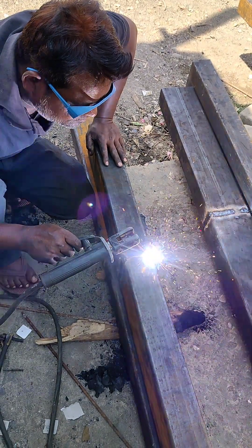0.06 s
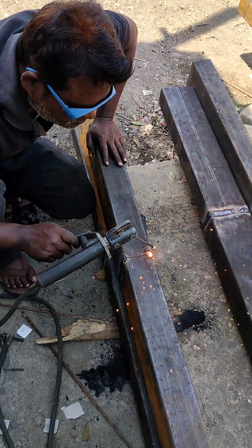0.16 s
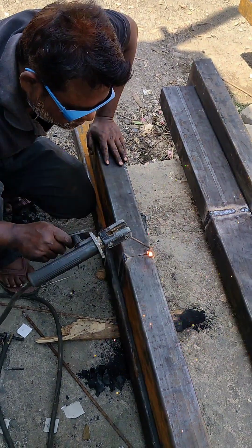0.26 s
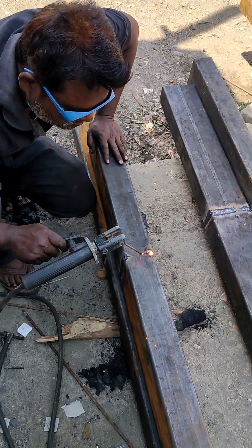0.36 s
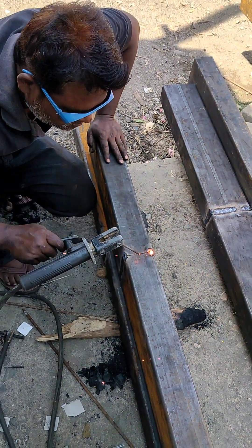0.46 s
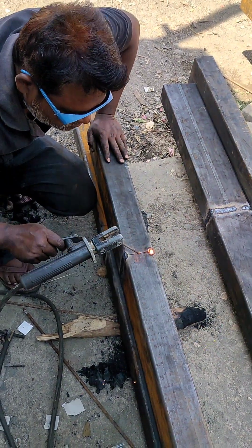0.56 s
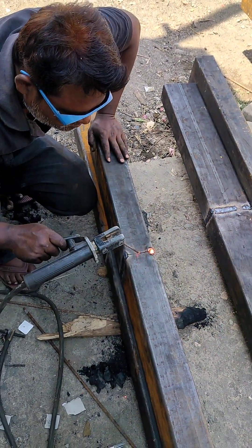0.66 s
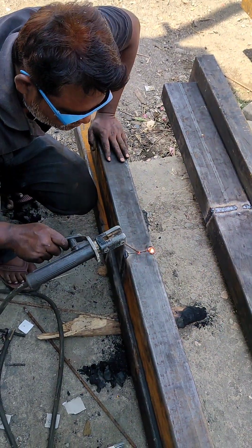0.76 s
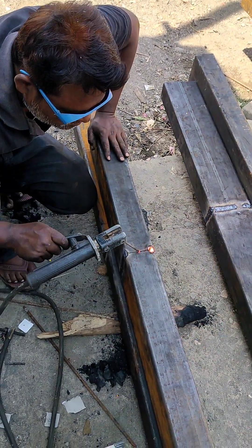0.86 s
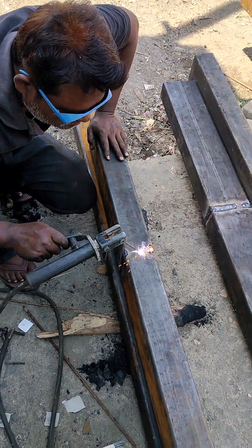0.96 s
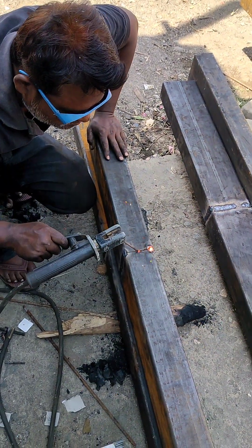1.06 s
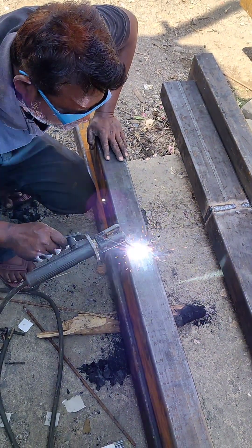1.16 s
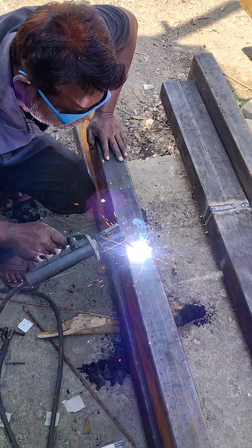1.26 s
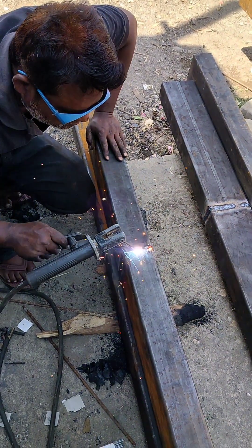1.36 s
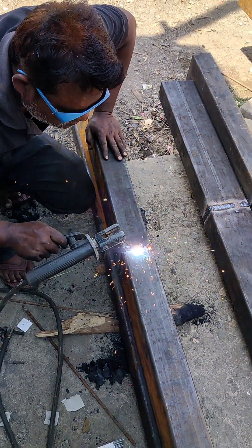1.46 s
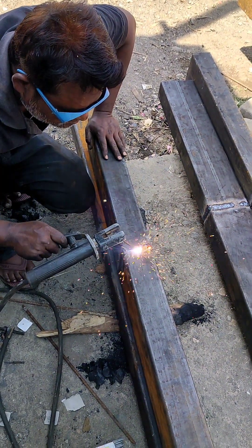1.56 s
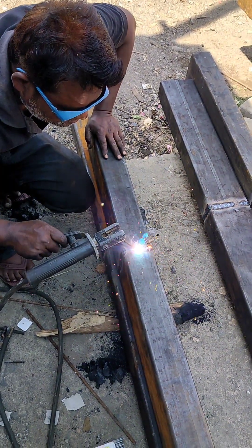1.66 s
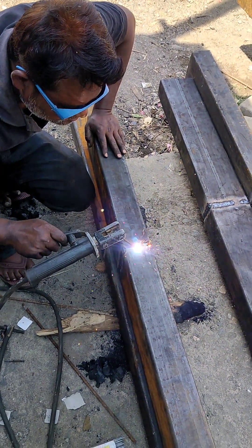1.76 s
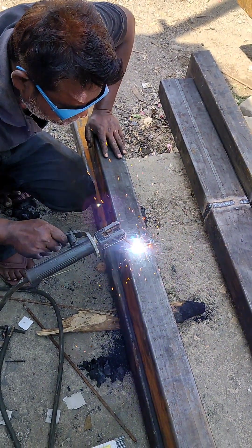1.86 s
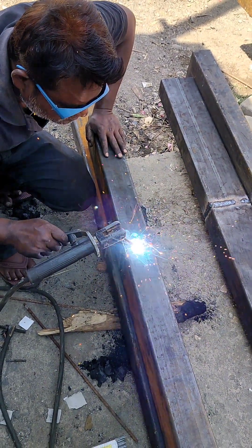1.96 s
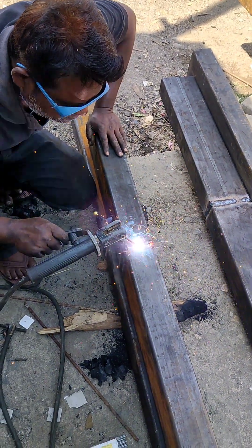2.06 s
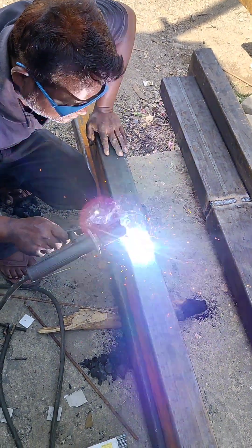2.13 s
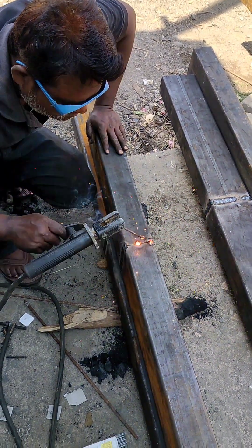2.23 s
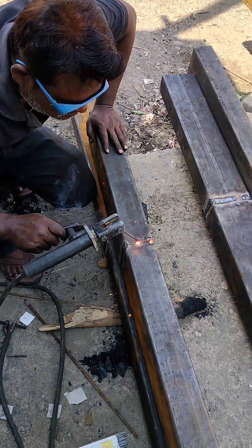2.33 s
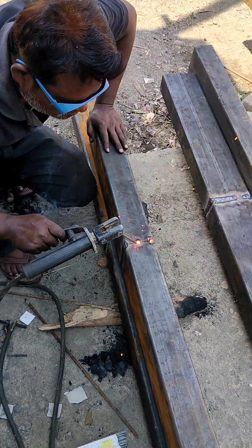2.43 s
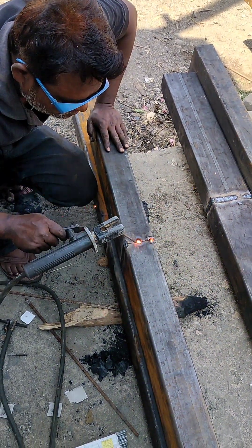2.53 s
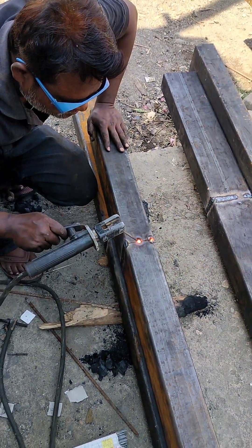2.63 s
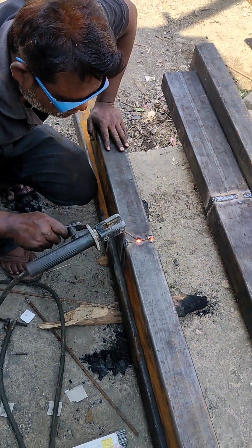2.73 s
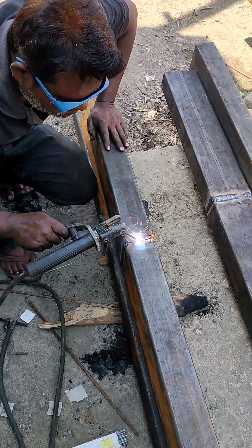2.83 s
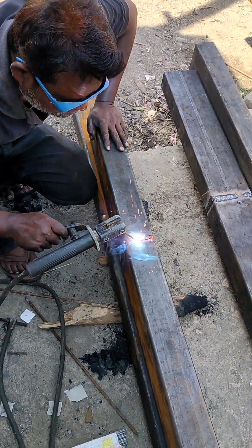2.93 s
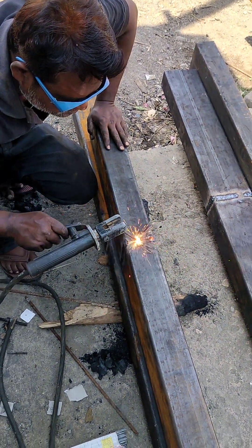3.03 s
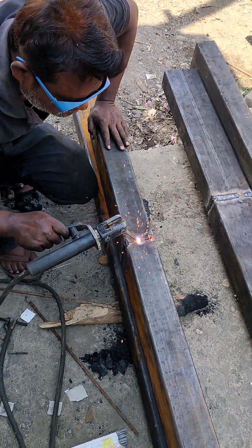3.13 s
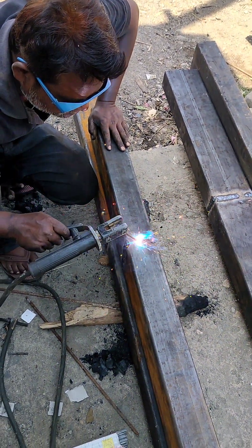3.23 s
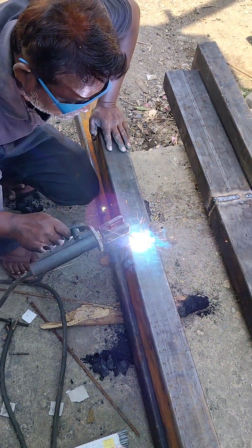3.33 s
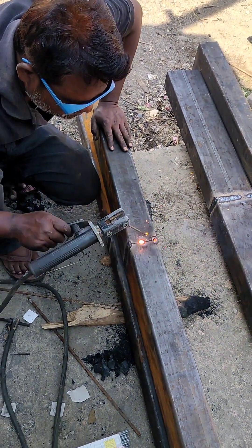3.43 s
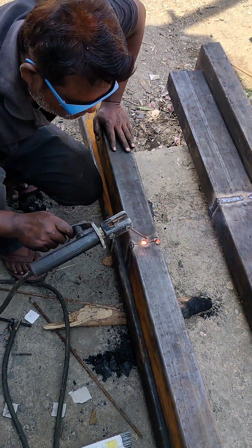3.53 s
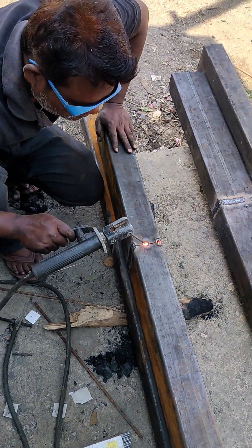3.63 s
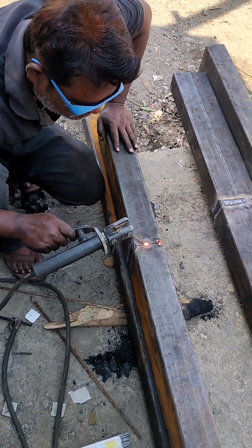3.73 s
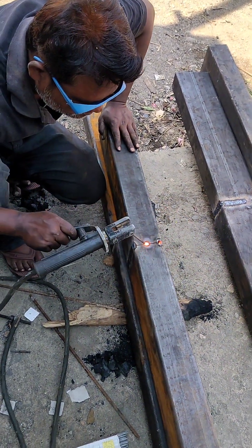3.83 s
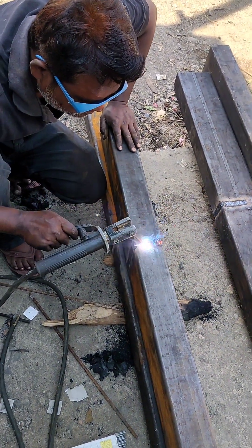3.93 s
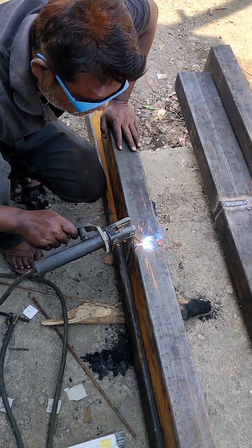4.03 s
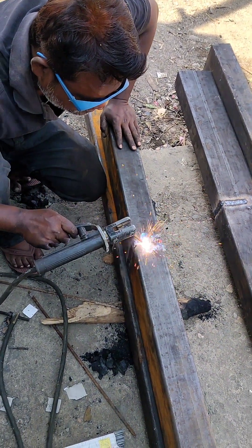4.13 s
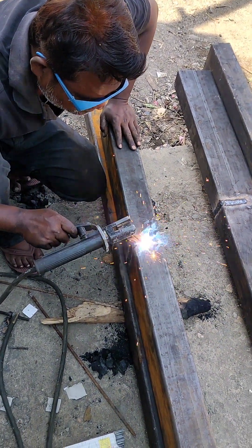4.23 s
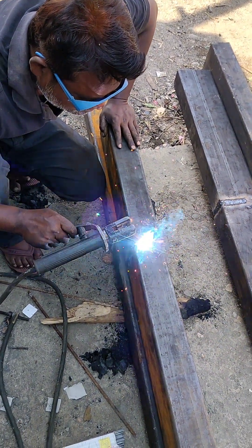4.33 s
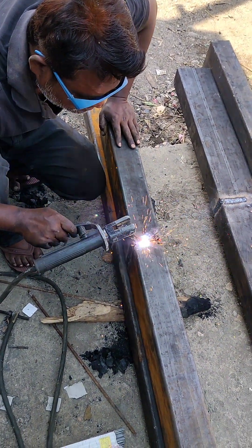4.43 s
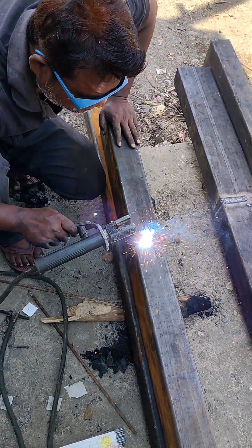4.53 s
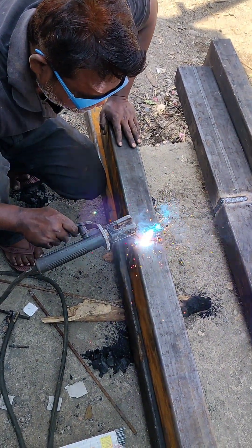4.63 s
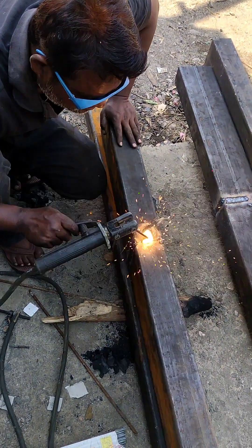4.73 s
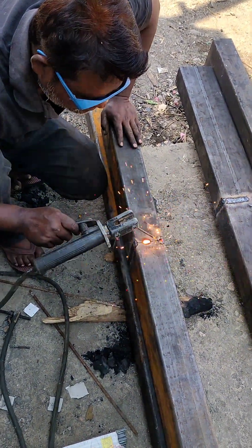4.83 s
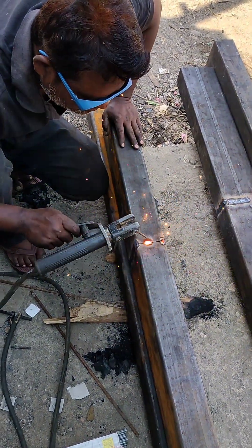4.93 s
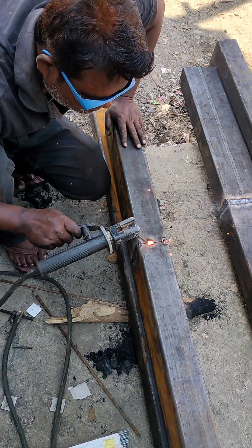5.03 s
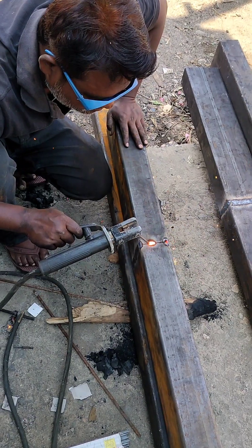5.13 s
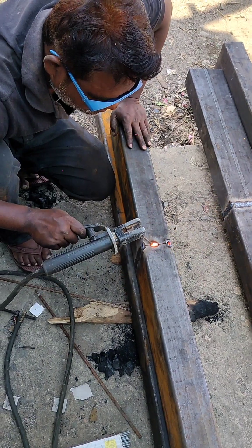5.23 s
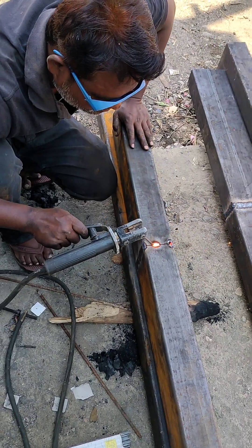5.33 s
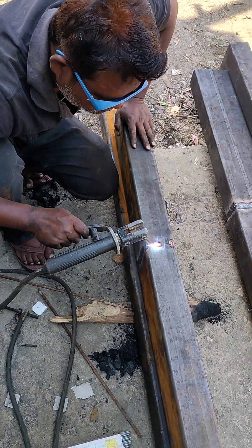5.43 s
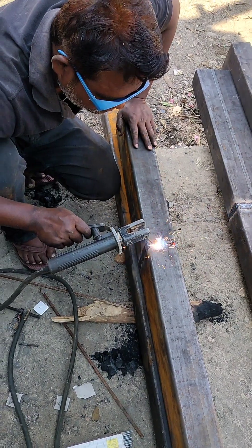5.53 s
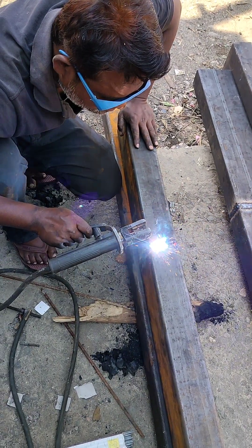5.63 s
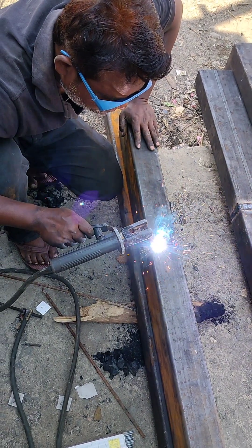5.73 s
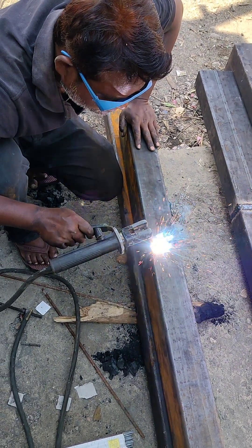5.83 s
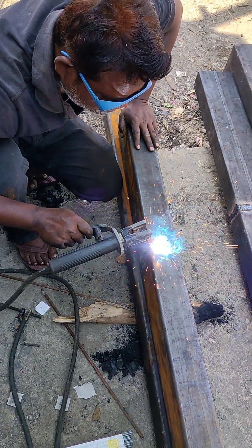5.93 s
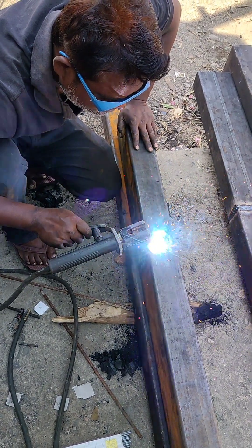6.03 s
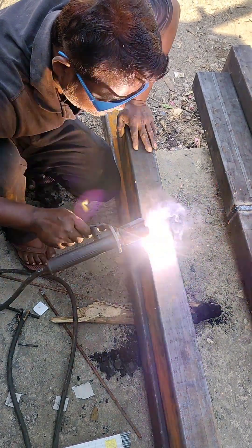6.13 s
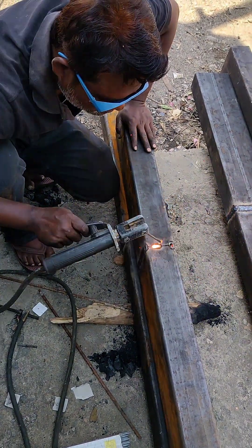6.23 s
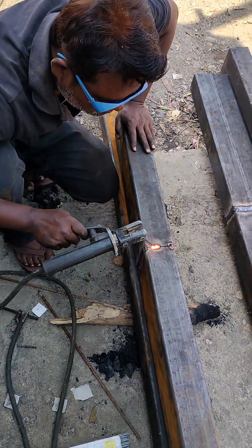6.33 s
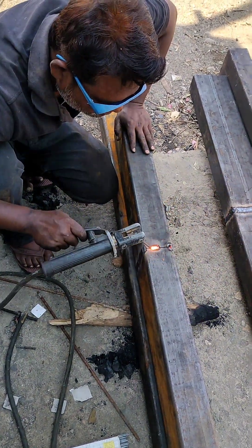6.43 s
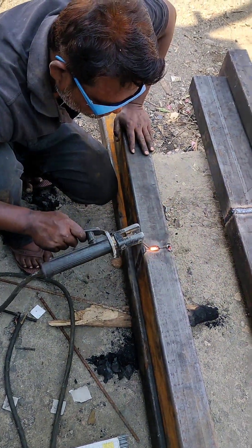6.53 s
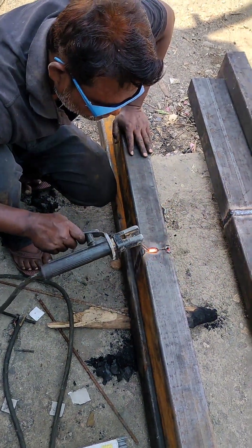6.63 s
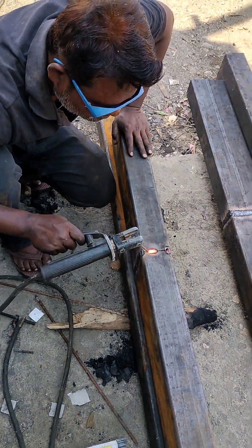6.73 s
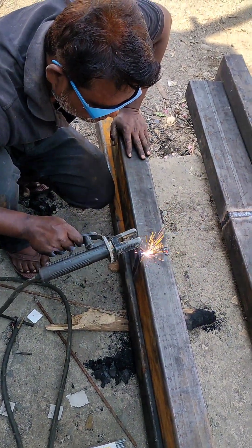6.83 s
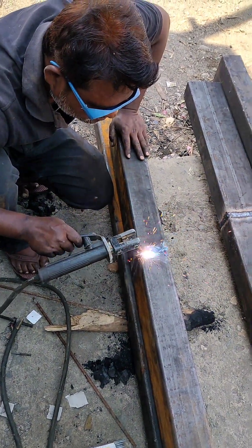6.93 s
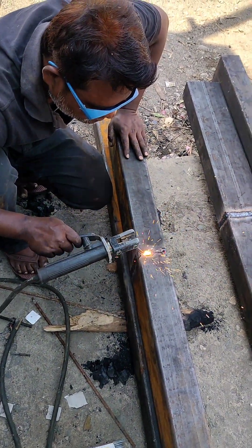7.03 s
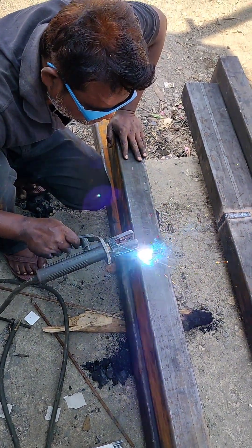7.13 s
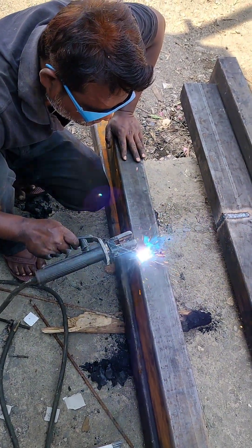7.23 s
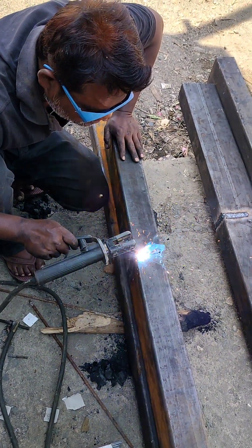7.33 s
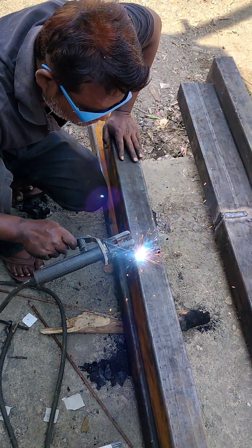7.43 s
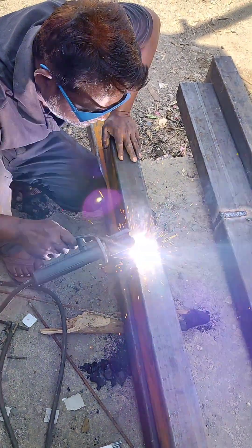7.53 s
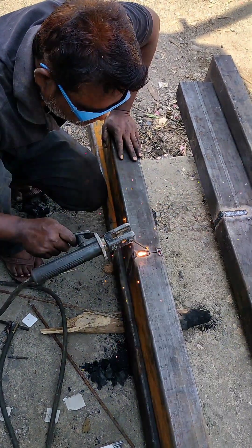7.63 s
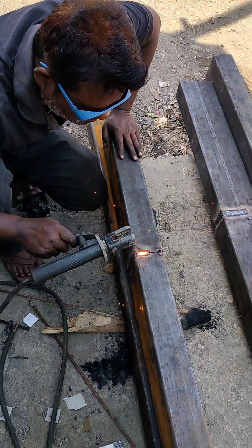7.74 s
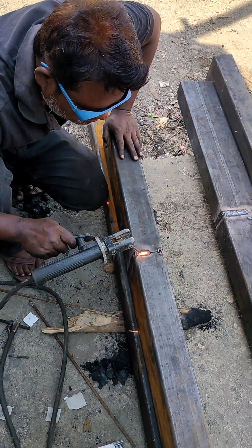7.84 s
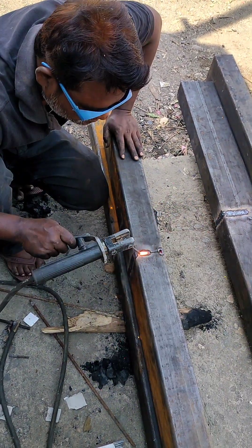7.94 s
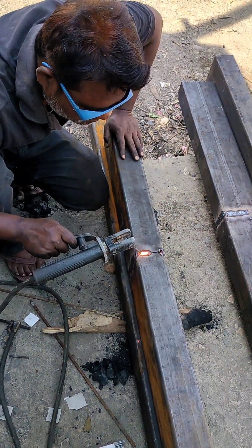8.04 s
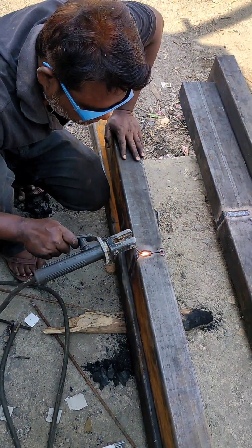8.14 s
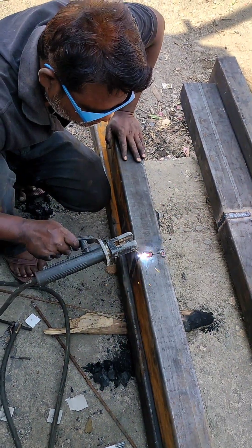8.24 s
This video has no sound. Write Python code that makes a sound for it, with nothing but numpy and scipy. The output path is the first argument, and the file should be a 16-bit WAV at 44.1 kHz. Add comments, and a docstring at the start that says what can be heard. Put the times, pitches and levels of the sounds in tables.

```python
"""A scrap of welding sizzle, then a slow engine chugging further off and a light breeze on the microphone.
The arc, close below on a steel tube, comes in short runs: fluttering noise for sizzle and gas, kicks for sparks.
Bursting drops bang and shove the two microphone ports, which answer with a low thump.
The engine is a repeating pattern of ringing blows over a roar; the air and breeze are shaped noise.
Now and then something clinks in the distance: short rings of narrow noise."""
import sys
import numpy as np
from scipy import signal
from scipy.fft import rfft, irfft, next_fast_len
from scipy.io import wavfile
from scipy.ndimage import uniform_filter1d, map_coordinates

SR = 44100
rng = np.random.default_rng(int(sys.argv[2]) if len(sys.argv) > 2 else 0)


def persist_wave(psi):
    """Save psi, clipped to +-1, as 16-bit WAV."""
    counts = np.round(np.clip(psi, -1, 1) * 32767).astype(np.int16)
    wavfile.write(sys.argv[1], SR, np.atleast_2d(counts).T)


N = 364707
T = np.arange(N) / SR  # s

# Levels and pushes in the tables and settings are relative: the functions trim them further.
# Runs of the arc: strike t/s, break t/s, steady sizzle level/dB,
# gas rush level/dB as the electrode pulls away, length of that pull t/s
BURNS = [(0, 0.039, -33.5, -48, .05), (0.919, 0.946, -31.5, -62, .03), (1.096, 2.092, -34.5, -39, 0.042),
         (2.746, 3.31, -36, -35, 0.014), (3.887, 4.694, -34, -37, 0.073), (5.376, 6.069, -36, -39.5, 0.44),
         (6.711, 7.518, -37, -30.5, 0.033), (8.191, 8.265, -42, -50, 0.044)]
# Bursting drops: t/s, signed push on left port, on right port [linear], crack level/dB, bang level/dB
POPS = [(1.213, -0.24, -0.44, -9.5, -19), (1.3006, -.1, 0.35, -41, -33), (1.4003, -0.31, 0.081, -14, -24.5),
        (1.4658, -0.33, -.05, -14, -32), (1.5204, -0.54, -0.044, -19, -34), (1.524, 0.37, 0.44, -27, -20),
        (1.6156, -0.54, -.02, -15.5, -20.5), (1.6858, -0.49, -0.26, -16.5, -20),
        (1.7348, -0.54, -0.01, -14, -20), (2.7871, -0.27, -0.11, -12, -33), (2.929, -0.43, -0.22, -13, -22),
        (3.0324, -0.18, -0.045, -13.5, -35), (3.0643, -0.15, -0.033, -15.5, -34),
        (3.98, -0.48, -0.16, -19.5, -25), (4.067, -0.63, 0, -16, -24), (4.1353, 0.51, 0.038, -23.5, -38),
        (4.1514, -0.26, 0.011, -17, -28), (4.2062, 0.55, 0.26, -28, -17.5), (4.4597, -.12, -0.2, -29, -35),
        (4.4732, -0.09, 0.45, -24, -26), (4.4921, 0.49, 0.011, -30, -11.5), (4.5754, -.16, 0.33, -16, -21),
        (5.4512, -0.29, -.05, -25, -29), (5.5394, -0.47, 0.012, -17.5, -29), (5.598, 0.51, 0.092, -18, -32),
        (5.8471, -0.56, -0.024, -20.5, -23), (5.8526, 0.35, .3, -18, -31),
        (5.8716, -0.16, 0.27, -23.5, -14), (5.8829, -0.53, -0.38, -34, -25.5),
        (5.9044, 0.013, 0.52, -27, -19.5), (5.918, 0, -0.36, -20, -32), (6.887, -0.53, -.16, -15.5, -22),
        (6.9344, 0.79, 0.27, -25.5, -15), (6.9556, 0.5, -0.051, -26, -10.5),
        (6.9864, -0.24, -0.035, -21.5, -17.5), (7.034, 0.029, 0.39, -24, -19.5),
        (7.0894, -0.12, -0.047, -13.5, -20), (7.1525, 0.49, 0.21, -34, -14.5),
        (7.1745, -0.57, -0.23, -23, -39), (7.1788, 0.26, .38, -35, -16.5), (7.25, 0.049, -0.31, -18.5, -12),
        (7.3857, 0.52, 0.31, -24.5, -18), (8.2229, 0.49, -0.036, -21.5, -14)]
# The loudest sparks: t/s, level/dB
SNAPS = [(1.099, -23.5), (1.13, -19.5), (1.2766, -15), (1.3488, -20), (1.368, -20), (1.395, -15),
         (1.4541, -16.5), (1.48, -16.5), (1.5133, -16), (1.6012, -24.5), (1.7528, -18.5), (1.768, -16),
         (1.906, -16), (2.0159, -16), (2.066, -24), (2.7683, -17.5), (2.8101, -18.5), (2.9167, -14),
         (2.962, -21), (2.9952, -16.5), (3.0477, -13.5), (3.0868, -19), (3.1627, -15.5), (3.1825, -16.5),
         (3.196, -20), (3.285, -19), (3.969, -16.5), (4.0505, -21), (4.102, -18.5), (4.2236, -15),
         (4.3141, -22), (4.4318, -16.5), (4.482, -17), (4.5254, -20.5), (4.637, -20), (5.4353, -24),
         (5.4403, -17), (5.6227, -20.5), (5.731, -19.5), (5.771, -15.5), (5.8258, -16), (5.973, -17.5),
         (6.0043, -17), (6.0175, -21.5), (6.832, -21.5), (6.8552, -16), (6.9304, -16), (7.1031, -18),
         (7.217, -20), (7.3604, -17), (7.3806, -18.5), (7.4287, -19), (7.4766, -14.5), (7.4796, -21)]
# Distant clinks: t/s, level/dB, f/Hz
CLINKS = [(2.544, -36, 1700), (6.539, -40, 1760), (6.585, -35, 1815), (7.694, -35, 1800)]
# Blows in one engine cycle: share of the cycle [0 to 1], thud level/dB, casing ring level/dB
STROKES = [(.036, -3, -7), (.165, -11, -5), (.297, -1, -20), (.36, -12, -5), (.461, -5, -18),
           (.599, -5, -20), (.616, 0, -20), (.733, -2, -14), (.818, -19, 0)]
# Background beyond the arc: t/s, engine level/dB, yard air level/dB
BACKGROUND = [(0.0, -39.5, -48), (1.04, -36.5, -46), (1.47, -41.5, -48), (2.62, -36.5, -45),
              (5.48, -37.5, -46), (5.78, -39, -44), (8.27, -37, -44)]
# Gusts on the ports: t/s, level/dB
GUSTS = [(.66, -36.5), (.89, -29.5), (1.4, -36.5), (3.1, -42), (3.7, -38), (3.9, -30.5), (4.73, -31.5),
         (4.88, -39.5), (5.42, -31.5), (5.8, -34), (6.6, -48), (8, -43)]

# Resonances of the engine's exhaust, its casing, and the welded tube: f/Hz, width f/Hz, level/dB
EXHAUST = [(167.1, 39.4, -1.5), (234.3, 65, 1), (305.5, 66, -3.5), (358.5, 32.6, -6.5)]
CASING = [(695.5, 23, 12), (920, 70, -8.5), (583, 36, -6)]
TUBE = [(2440, 49, 0), (2570, 50, -15), (4690, 52.6, -3.5), (4990, 41, -4), (5590, 50, 3.5),
        (5800, 34, -25), (6970, 64, -13.5), (11400, 86, -14)]

# Spectrum shapes of sparks, arc sizzle, arc gas and drop bangs: f/Hz, level/dB (per Hz)
SPARK = [(30, -29), (250, -1.5), (900, -20.5), (1700, -9), (2600, -4.5), (4500, -8), (7000, -5), (8100, 4),
         (8700, 2), (9800, 4), (12200, 6), (13800, 0.5), (15800, -5.5)]
SIZZLE = [(200, -5), (1500, -46), (2600, -14), (4000, -8.5), (5300, -5), (7200, -3.5), (8100, 8), (8700, 1),
          (9800, 5.5), (12000, 6), (13800, 1.5), (15800, 2.5)]
GAS = [(300, -32.5), (1000, -0.5), (1600, -4), (2000, 3), (2500, 2.5), (3500, 1), (5000, -11), (9000, -9.5)]
BANG = [(150, -15), (600, 12), (1200, 12), (2300, 9.5), (3500, -2.5), (5000, -36.5), (9000, -5)]
# Spectrum shapes of engine roar, yard air and breeze on the ports: f/Hz, level/dB (per Hz)
ROAR = [(30, -36.5), (100, -4), (140, -9), (190, -1), (300, 0), (380, -1), (440, -33.5), (700, -22),
        (1500, -53)]
AIR = [(240, -30.5), (400, 1.5), (562, -2), (697, 0.5), (742, -10), (979, -2.5), (1160, -12), (1650, -7.5),
       (2320, -12), (3310, -17.5), (3530, -23.5), (5520, -31.5), (10700, -36.5), (16000, -60)]
BUFFET = [(10, -32.5), (30, 1), (55, 9.5), (100, 4), (200, -8), (500, -52)]

# Right port over left port for the close arc: f/Hz, level/dB
RIGHT_PORT = [(300, 12), (1500, -6.5), (2600, 4), (3800, -4), (6500, -4), (8000, 2.5), (12500, 7),
              (15500, -1.5)]
# Right port behind left port for the close arc: f/Hz, phase/rad
RIGHT_LAG = [(1000, 0.12), (4300, 0.18), (5500, 2.4), (6500, 5.16), (8300, 4.8), (10500, 6.9), (13000, 7.2),
             (15500, 6.9)]
# Time for the yard's answer to fall 60 dB: f/Hz, t/s
WALLS = [(200, 0.097), (2500, 0.073), (12000, 0.043)]

ARC_FADE_T60 = .1  # s to fall 60 dB after a break
STRIKE_DB = -31.5  # the crack of the electrode touching down
BUILD_DB, BUILD_S = 6, .12  # a fresh arc starts this much weaker and builds up
CALM_GAS_DB = -49  # gas rush of an undisturbed arc
FLARE_RISE_S, FLARE_FALL_S = 0.011, 0.023  # the arc flares around every snap and pop
FLARE_SIZZLE_DB, FLARE_GAS_DB = -26.5, -24  # the flare, relative to its snap or pop
SPRAY_DB, SPRAY_SCATTER_DB, SPRAY_S = -6.5, 2, .022  # lesser sparks: level under the snap, scatter, delay
NEAR_DB, NEAR_S = -14.5, .006  # close echoes taken together; the latest possible one
CYCLES_PER_S, SPEED_DRIFT = 9.9, .02  # mean engine speed; share by which it wanders
GUST_RISE_S, GUST_FALL_S, LULL_DB = 0.071, 0.1, -49.5  # swell and fade of a gust; breeze between gusts
CLINK_WIDTH_HZ, CLINK_T60 = 220, .11  # breadth of the ring; s to fall 60 dB
TOP_HZ = 15950  # upper band limit


def amp(db):
    """Decibels to gain."""
    return 10 ** (np.asarray(db) / 20)


def unit(x):
    """Scaled to rms 1."""
    return x / np.sqrt(np.mean(x ** 2) + 1e-20)


def along(points, hz):
    """(f/Hz, value) points read on a log frequency axis."""
    f, values = np.transpose(points)
    return np.interp(np.log(hz + 1), np.log(f), values)


def curves(rows):
    """One value per sample for each column after the time."""
    s, *columns = np.transpose(rows)
    return [np.interp(T, s, column) for column in columns]


def wobble(rate):
    """A smooth random curve, rate knots a second."""
    knots = rng.standard_normal(int(N * rate / SR) + 4)
    return map_coordinates(knots, [T * rate])


def filtered(x, response):
    """x times a complex response of frequency."""
    size = next_fast_len(N + SR // 2)
    hz = np.fft.rfftfreq(size, 1 / SR)
    return irfft(rfft(x, size) * response(hz), size)[..., :N]


def coloured(x, spectrum):
    """x through a causal, minimum-phase filter of unit energy with this spectrum."""
    size = 4096
    gains = amp(along(spectrum, np.fft.rfftfreq(size, 1 / SR)))
    cepstrum = irfft(np.log(gains))
    # folding the cepstrum forward puts the filter's energy at its start
    cepstrum[1:size // 2] *= 2
    cepstrum[size // 2 + 1:] = 0
    kernel = irfft(np.exp(rfft(cepstrum)))
    return signal.oaconvolve(x, kernel[None] / np.linalg.norm(kernel), axes=1)[:, :N]


def resonate(x, modes):
    """x through parallel resonances of alternating sign."""
    def response(f):
        total = 0
        for k, (centre, width, db) in enumerate(modes):
            damping = 1j * f * width
            total = total + (-1) ** k * amp(db) * damping / (centre * centre - f * f + damping)
        return total

    return filtered(x, response)


def pair(shape, side_db):
    """Left and right white noise, partly alike: a shared middle and an opposed side."""
    mid, side = rng.standard_normal((2, *shape))
    return unit(np.array([mid + amp(side_db) * side, mid - amp(side_db) * side]))


def rush(spectrum, side_db):
    """Coloured stereo noise of rms 1."""
    return unit(filtered(pair((N,), side_db), lambda hz: amp(along(spectrum, hz))))


def patchy(x, depth_db):
    """x with its colour shifting at random from moment to moment, at rms 1."""
    z = signal.stft(x, nperseg=1024)[2]
    field = rng.standard_normal(z.shape[1:])
    for axis in (0, 1):
        field = uniform_filter1d(field, size=4, axis=axis)
    shifted = signal.istft(z * amp(depth_db * unit(field)), nperseg=1024)[1]
    return unit(shifted[:, :N])


def place(times, shapes):
    """Stereo shapes (2, events, samples) laid down at their times."""
    starts = np.round(np.abs(times) * SR).astype(int)
    index = starts[:, None] + np.arange(shapes.shape[-1])
    return np.array([np.bincount(index.ravel(), s.ravel(), N)[:N] for s in shapes])


def swells(times, db, rise_s, fall_s):
    """A level that swells and fades around each event; overlapping swells add in power."""
    t = np.arange(-(SR // 2), SR // 2) / SR
    shape = np.exp(-(t / np.where(t < 0, rise_s, fall_s)) ** 2)
    power = np.bincount(np.round(np.abs(times) * SR).astype(int), amp(db) ** 2, N)[:N]
    return np.sqrt(np.abs(signal.oaconvolve(power, shape, "same")))


def cracks(times, db, life, side_db, spectrum):
    """Each spark is a dying rattle of random-sign kicks, life in s; db is its energy spread over 1 ms."""
    t = np.arange(SR // 300) / SR
    lives = life * np.exp(0.25 * rng.standard_normal((len(times), 1)))
    envelope = np.exp(-(t / lives) ** 4) + .2 * np.exp(-t / .002)
    bursts = np.sign(pair((len(times), len(t)), side_db)) * envelope
    mean_energy = np.sum(bursts ** 2, axis=2).mean(axis=0)
    bursts /= np.sqrt(mean_energy / (SR / 1000))[:, None]
    return coloured(place(times, bursts * amp(db)[..., None]), spectrum)


def swarm(level, spectrum, count, spread_db, life, side_db):
    """Sparks at random moments, many small and a few large, following a level curve."""
    times = rng.uniform(0, T[-1], size=count)
    size_db = np.minimum(spread_db * rng.exponential(size=count), 13)
    db = 20 * np.log10(level[(times * SR).astype(int)] + 1e-9) + size_db
    return cracks(times, db, life, side_db, spectrum)


def burning(fade_t60):
    """1 while the arc burns: it strikes at once and dies away exponentially after the break."""
    runs = [(T >= on) * amp(-60 * np.maximum(T - off, 0) / fade_t60) for on, off, *_ in BURNS]
    return np.max(runs, axis=0)


def arc_levels():
    """Sizzle and gas in dB: the arc builds up, flares at snaps and pops, and rushes as it is pulled away."""
    strike_s, break_s, steady_db, parting_db, pull_s = np.transpose(BURNS)
    snap_s, snap_db = np.transpose(SNAPS)
    pop_s, _, _, crack_db, bang_db = np.transpose(POPS)
    run = np.searchsorted(strike_s[1:], T)
    steady = amp(steady_db[run] - BUILD_DB * np.exp(-(T - strike_s[run]) / BUILD_S))
    flare_s = np.r_[snap_s, pop_s]
    flare_db = np.r_[snap_db, np.maximum(crack_db, bang_db)]
    flare = swells(flare_s, flare_db, FLARE_RISE_S, FLARE_FALL_S)
    before_break = np.minimum(T - break_s[run], 0)
    parting = amp(parting_db[run]) * np.exp(-(before_break / pull_s[run]) ** 2)
    sizzle = steady ** 2 + (amp(FLARE_SIZZLE_DB) * flare) ** 2
    gas = amp(CALM_GAS_DB) ** 2 + (amp(FLARE_GAS_DB) * flare) ** 2 + parting ** 2
    return 10 * np.log10(sizzle), 10 * np.log10(gas)


def loud_sparks():
    """Single snaps, the cracks of bursting drops, and the electrode touching down at all but the first run."""
    snap_s, snap_db = np.transpose(SNAPS)
    pop_s, _, _, pop_db, _ = np.transpose(POPS)
    spark_s, spark_db = np.r_[snap_s, pop_s], np.r_[snap_db, pop_db]
    loud = cracks(spark_s, spark_db, life=0.00091, side_db=-15.5, spectrum=SPARK)
    strike_s = np.transpose(BURNS)[0, 1:]
    strike_db = np.full(len(strike_s), STRIKE_DB)
    return loud + cracks(strike_s, strike_db, life=0.0013, side_db=-4.5, spectrum=SPARK)


def spray(count):
    """Lesser sparks trail each loud snap."""
    s, db = np.repeat(SNAPS, count, axis=0).T
    delay, size = rng.standard_normal((len(s), 2)).T
    times = s + SPRAY_S * np.abs(delay)
    levels = db + SPRAY_DB + SPRAY_SCATTER_DB * size
    return cracks(times, levels, life=.0013, side_db=-12, spectrum=SPARK)


def at_ports(sound):
    """The two microphone ports colour and delay the close treble differently."""
    ports = np.array([[-.5], [.5]])  # left and right each take half the difference

    def response(hz):
        gain = amp(ports * along(RIGHT_PORT, hz) + 1.0)
        return gain * np.exp(-1j * ports * along(RIGHT_LAG, hz))

    return filtered(sound, response)


def arc():
    """A fluttering sizzle and rush of gas, swarms of small sparks, and single loud snaps."""
    sizzle_db, gas_db = arc_levels()
    alight = burning(ARC_FADE_T60)
    flutter_db = 2 * wobble(55) + 3.2 * wobble(450)
    sizzle = amp(sizzle_db + flutter_db - 2.0) * patchy(rush(SIZZLE, side_db=-7), depth_db=3.5)
    gas = amp(gas_db + flutter_db - 4.5) * patchy(rush(GAS, side_db=-4), depth_db=4)
    crackle_level = alight * amp(sizzle_db - 1.0)
    crackle = swarm(crackle_level, SPARK, count=900, spread_db=3.5, life=0.0005, side_db=-9.5)
    sputter_level = alight * amp(gas_db - 1.5)
    sputter = swarm(sputter_level, GAS, count=900, spread_db=5.0, life=0.0011, side_db=-2.0)
    return at_ports(alight * (sizzle + gas) + crackle + sputter + loud_sparks() + spray(count=2))


def slag(cooling_t60=3):
    """Faint ticks in each run; the hot bead goes on ticking after it, fading 60 dB in cooling_t60 s."""
    level = amp(-67.0) * burning(cooling_t60)
    return swarm(level, SPARK, count=420, spread_db=15.5, life=.0005, side_db=-10.5)


def nearby(x, count):
    """A few weak echoes off the tube, the ground and the welder ripple the spectrum."""
    delays = NEAR_S * rng.uniform(.1, 1, size=count)
    taps = np.bincount((delays * SR).astype(int)) * amp(NEAR_DB) / np.sqrt(count)
    return signal.oaconvolve(x, taps[None], axes=1)[:, :N]


def walls(x):
    """The yard's short answer: x through decaying noise, treble dying first."""
    hz, t, z = signal.stft(rng.standard_normal((2, SR // 3)), SR, nperseg=256)
    decay = amp(-60 * t / along(WALLS, hz)[:, None])
    tail = signal.istft(z * decay, SR, nperseg=256)[1]
    tail = np.pad(tail, ((0, 0), (SR // 200, 0)))  # the answer starts 5 ms late
    return signal.oaconvolve(x, tail / np.linalg.norm(tail[0]), axes=1)[:, :N]


def engine():
    """An uneven pattern of thuds and casing rings returns every cycle, over a rough roar."""
    turns = np.cumsum(CYCLES_PER_S * (1 + SPEED_DRIFT * wobble(1))) / SR
    share, thud_db, ring_db = np.transpose(STROKES)
    blows = (np.arange(int(turns[-1]) + 1)[:, None] + share).ravel()
    times = np.interp(blows, turns, T, right=2 * T[-1])  # blows past the end fall outside

    def struck(db, modes, scatter_db):
        scatter = scatter_db * rng.standard_normal((2, len(blows)))
        sizes = amp(np.resize(db, len(blows)) + scatter)
        return unit(resonate(place(times, sizes[..., None]), modes))

    thuds = struck(thud_db, EXHAUST, scatter_db=0.5)
    rings = struck(ring_db, CASING, scatter_db=2.5)
    sound = amp(-1.0) * thuds + amp(-18.5) * rings + amp(-1.5) * rush(ROAR, side_db=-6)
    lean = amp([[.8], [-.8]])  # slightly to the left
    return amp(curves(BACKGROUND)[0]) * sound * lean


def outdoors():
    """Yard noise of gently wavering level, and lumps of breeze on the ports."""
    air_level = amp(curves(BACKGROUND)[1] + 3.0 + wobble(16))
    air = air_level * patchy(rush(AIR, side_db=2.5), depth_db=2)
    lumps_db = 2.5 * wobble(20)
    wind = np.hypot(amp(LULL_DB), swells(*np.transpose(GUSTS), GUST_RISE_S, GUST_FALL_S))
    return air + wind * amp(lumps_db - 2.5) * rush(BUFFET, side_db=-3.5)


def thumps(leak=0.0036, rise=.00006, corner_hz=35):
    """A pop bangs and shoves each port's diaphragm; the pressure leaks away, the bass roll-off swings it back."""
    s, left, right, _, bang_db = np.transpose(POPS)
    push = np.array([left, right])[..., None]
    t = np.arange(SR // 20) / SR
    shove = np.exp(-t / leak) * (1 - np.exp(-t / rise))  # leak and rise in s
    # the loud snaps nudge the diaphragms more gently than the pops, either way
    snap_s, snap_db = np.transpose(SNAPS)
    nudge = np.sign(pair((len(snap_s),), side_db=1)) * amp(snap_db - 9.5)
    pressure = place(s, push * shove) + place(snap_s, nudge[..., None] * shove)
    roll_off = signal.butter(4, corner_hz, "high", fs=SR, output="sos")
    # the bang is one sharp kick, shared between the ports like the push
    kicks = push / np.linalg.norm(push, axis=0) * amp(bang_db + 19.5)[:, None]
    bangs = coloured(place(s, kicks), BANG)
    return amp(3.5) * signal.sosfilt(roll_off, pressure) + bangs


def clinks():
    """Far-off taps on metal, each a short fading ring of narrow noise."""
    t = np.arange(SR // 4) / SR
    fall = amp(-60 * t / CLINK_T60) * (1 - np.exp(-t / .0015))
    rings = []
    for _, db, hz in CLINKS:
        resonance = signal.iirpeak(hz, hz / CLINK_WIDTH_HZ, SR)
        ring = unit(signal.filtfilt(*resonance, pair((len(t),), side_db=-6)))
        rings.append(amp(db) * fall * ring)
    return place(np.transpose(CLINKS)[0], np.stack(rings, axis=1))


def scene():
    """The arc close by and almost dry, the rest of the yard behind it."""
    sparks = arc() + slag()
    # the steel tube rings faintly under the sparks
    sparks = sparks + nearby(sparks, count=4) + resonate(sparks, TUBE)
    echo = amp(-17) * walls(sparks)
    return sparks + echo + engine() + outdoors() + thumps() + clinks()


def record(dry):
    """Peaks round off near full scale; a steep filter removes what lies above the band limit."""
    rounded = dry / (1 + np.abs(dry / .95) ** 6) ** (1 / 6)
    return filtered(rounded, lambda hz: 1 / (1 + (hz / TOP_HZ) ** 120))


dry = scene()
out = record(dry)
persist_wave(out)
```